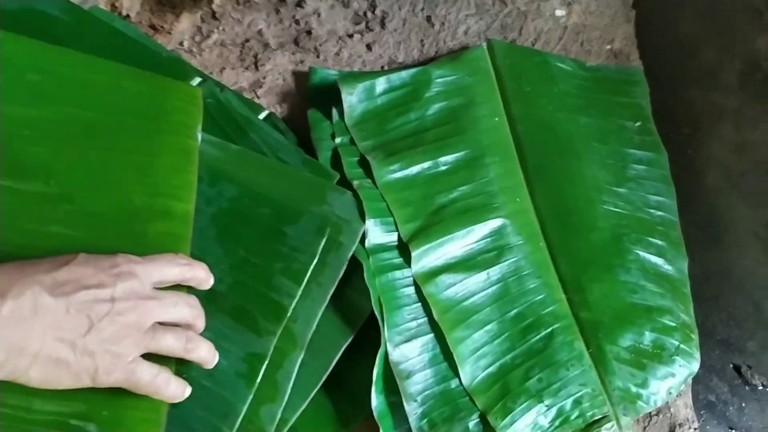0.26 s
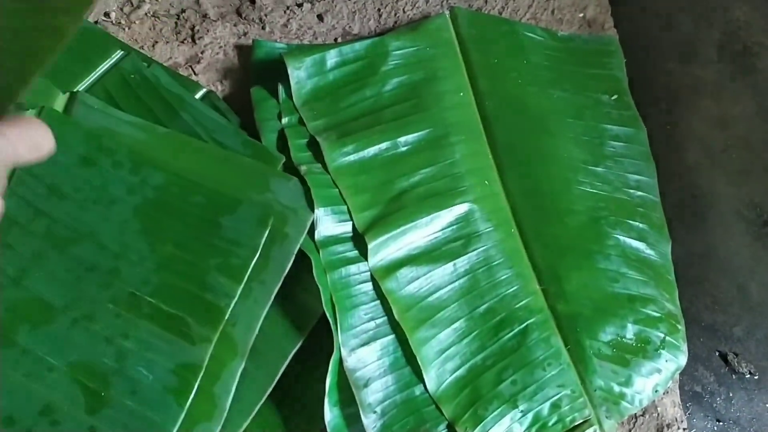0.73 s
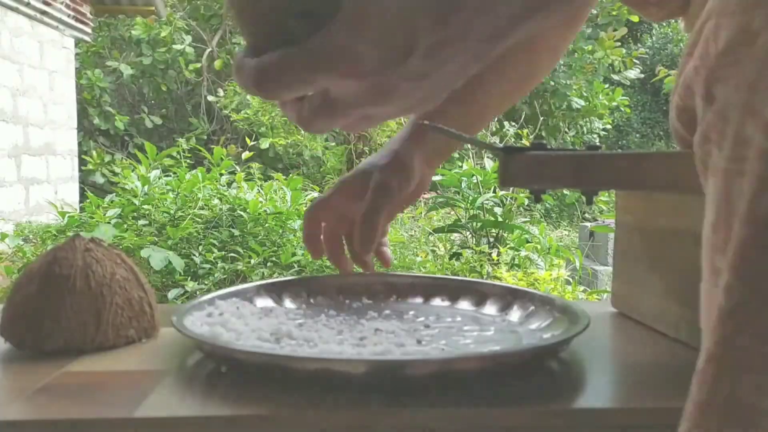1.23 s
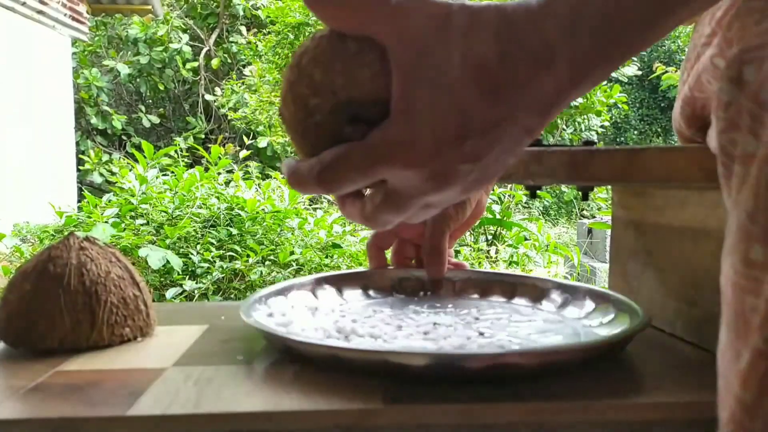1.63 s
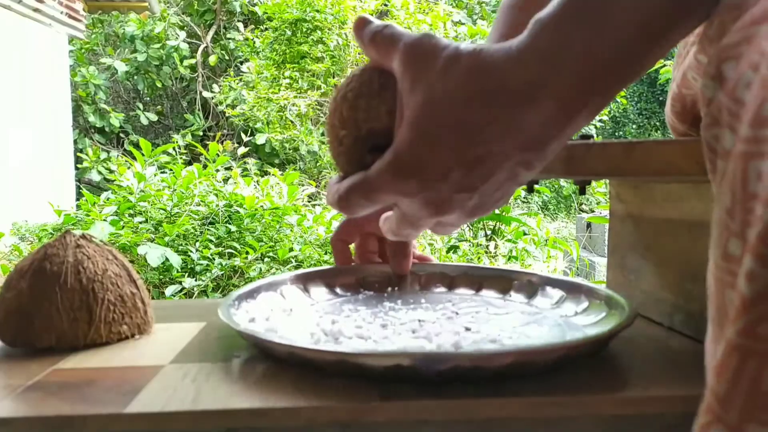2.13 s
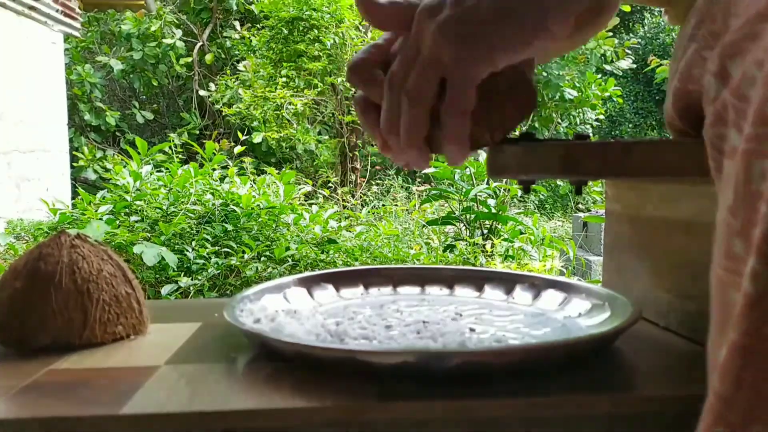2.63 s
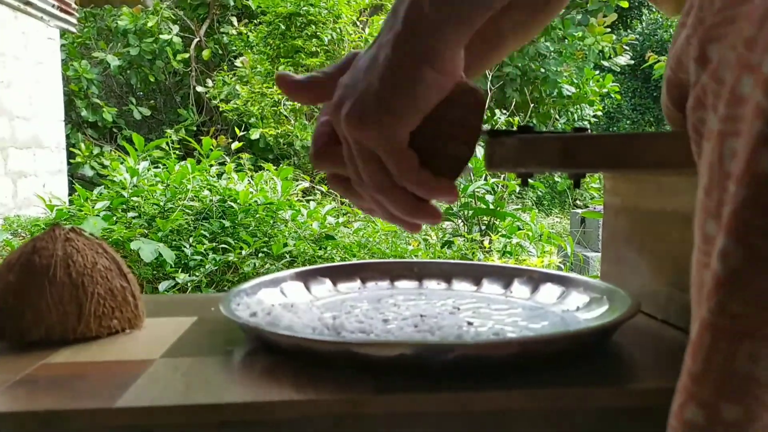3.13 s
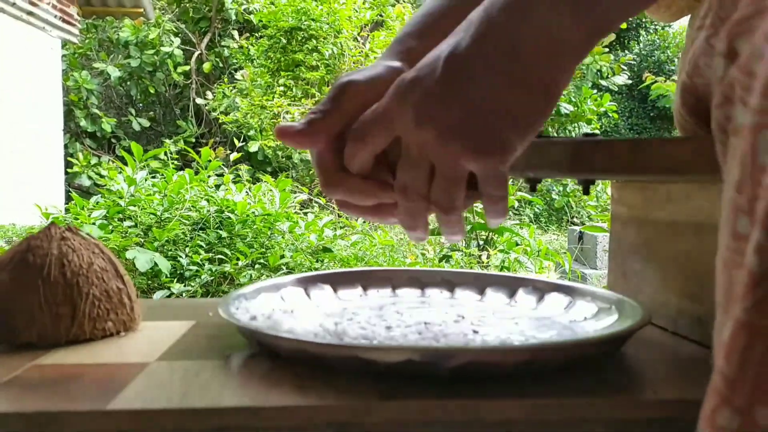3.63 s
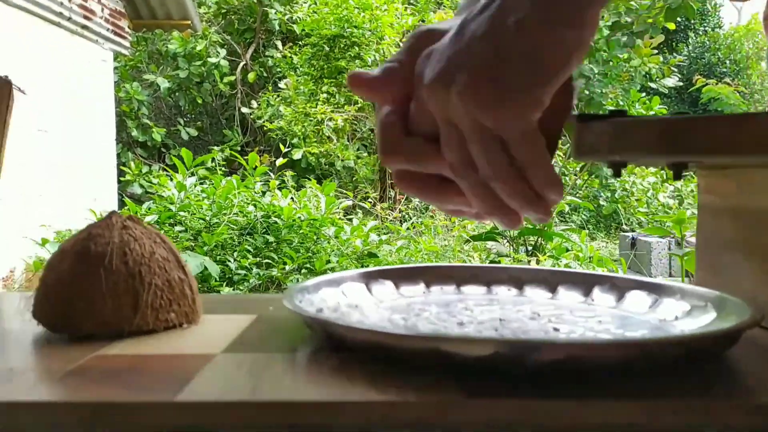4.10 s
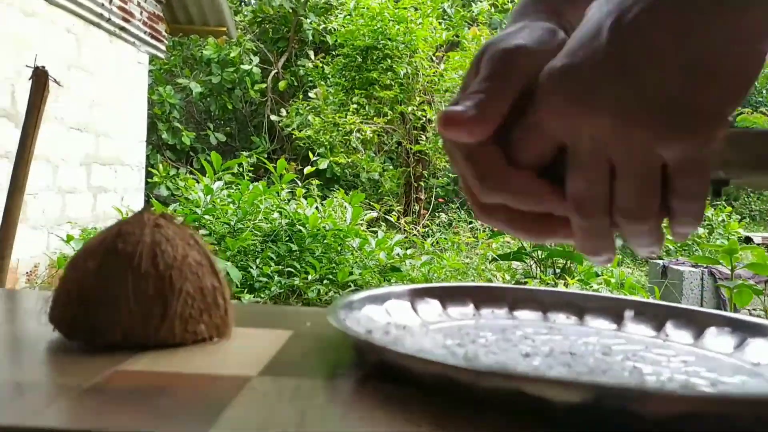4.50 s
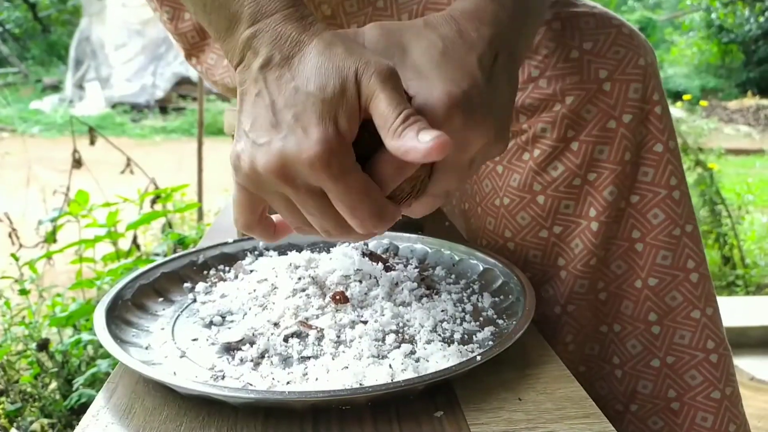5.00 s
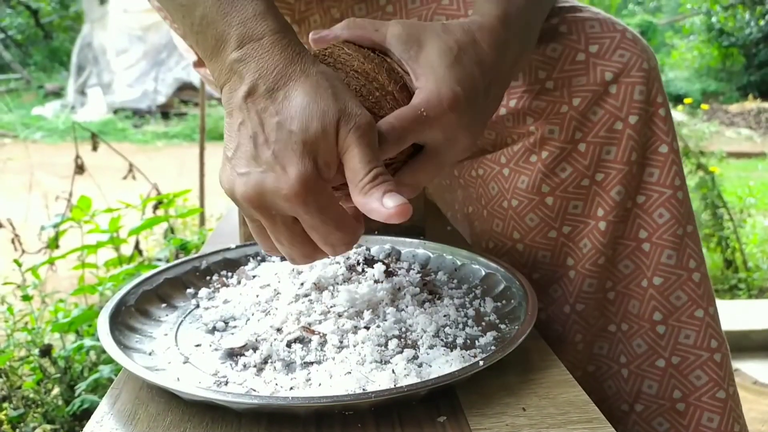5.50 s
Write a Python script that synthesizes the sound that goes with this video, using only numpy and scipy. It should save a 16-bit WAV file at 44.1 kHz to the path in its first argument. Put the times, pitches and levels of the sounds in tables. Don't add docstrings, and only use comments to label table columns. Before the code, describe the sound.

Three joined close takes outdoors under a porch: quiet leaf rustle fading away; fading in, fibrous husk brushing ending in crackle; then coconut shell grated on steel teeth. Each stroke is a burst of fast knocks, hollow and woody, with wet-dry tearing hiss and slight metallic ring. The last strokes, heard from the front, are strongest, with dull bench thuds. Thin insect shimmer and soft rumble continue behind.

```python
import sys
import numpy as np
from scipy import signal
from scipy.fft import rfft, irfft, next_fast_len
from scipy.io import wavfile
from scipy.ndimage import uniform_filter1d, map_coordinates

SR = 44100
rng = np.random.default_rng(int(sys.argv[2]) if len(sys.argv) > 2 else 0)


def wav_record(signal):
    frames = np.transpose(np.atleast_2d(signal))
    bounded = np.clip(frames, -1, 1)
    quanta = np.round(bounded * 32767).astype(np.int16)
    wavfile.write(sys.argv[1], SR, quanta)


def ratio_of_db(decibels):
    return 10 ** (np.asarray(decibels, float) / 20)


N = 253575
FRONT_S = 4.6

# start [t/s], hiss [level/dB], shell [level/dB], tilt [dB/octave], tilt change [per dB of hiss]
STRETCHES = [
    (0, -77, -77.5, 0, -0.25),
    (1.064, -77.5, -81, 1.5, 0.1657),
    (2.5, -69.5, -74.5, -1, -0.0341),
    (4.6, -66.5, -75, 2, -0.156),
]
# [f/Hz], width [f/Hz], [level/dB]
SHELL_MODES = [
    [(281, 68, -2), (408, 104, -2.5), (523, 58, 2.5), (824, 175, -5.5), (1670, 1700, -21)],
    [(240.1, 35, -7), (532, 64, 9), (632, 25, -2), (877, 180, 1), (1090, 280, -3.5), (1640, 360, -6.5)],
]
# [t/s], peak [level/dB]
TAPS = [(2.5758, -48), (2.6891, -29), (2.9761, -47.5), (3.2873, -35), (3.8456, -43), (4.2478, -42.5),
        (4.2829, -36), (4.6587, -34), (4.6778, -48), (5.0494, -33.5), (5.3239, -45), (5.4902, -42),
        (5.5065, -37.5), (5.56, -37)]


def unit(x):
    return x / np.sqrt(np.mean(x ** 2) + 1e-20)


def along(points, hz):
    f, v = np.transpose(points)
    return np.interp(np.log(hz + 1), np.log(f + 1), v)


def wobble(rate_hz):
    knots = rng.standard_normal(int(N * rate_hz / SR) + 4)
    return map_coordinates(knots, [np.arange(N) * rate_hz / SR])


def filtered(x, response):
    m = next_fast_len(N + SR // 2)
    return irfft(rfft(x, m) * response(np.fft.rfftfreq(m, 1 / SR)), m)[..., :N]


def high_pass(f, corner_hz):
    return 1 / (1 + (corner_hz / (f + 1)) ** 4)


def modes(table, f):
    total = 0
    for k, (centre, width, db) in enumerate(table):
        total = total + (-1) ** k * ratio_of_db(db) * 1j * f * width / (centre ** 2 - f ** 2 + 1j * f * width)
    return total


def struck(rows, gain_db):
    x = np.zeros(N)
    x[[round(row[0] * SR) for row in rows]] = [ratio_of_db(row[1] + gain_db) for row in rows]
    return x


def slips(per_s, spread_db):
    when, size, sign = rng.random((3, 2, N))
    heights = ratio_of_db(-spread_db * np.log(size + 0.011)) * np.sign(sign - 0.5)
    return unit((when < per_s / SR) * heights)


def patchy(x, depth_db, tilt_db=0):
    hz, t, z = signal.stft(x, SR, nperseg=256)
    field = uniform_filter1d(rng.standard_normal(z.shape[1:]), size=3, axis=0)
    field = uniform_filter1d(field, size=14, axis=1)
    octaves = np.log2(np.clip(hz, 1000, None) / 4000)[:, None]
    tilt = octaves * np.interp(t * SR, np.arange(N), tilt_db + np.zeros(N))
    return signal.istft(z * ratio_of_db(depth_db * unit(field) + tilt), nperseg=256)[1][:, :N]


def yard():
    # [t/s], [level/dB]
    rumble_level = [(0.0, -76.5), (0.3, -75), (0.8, -72), (1.3, -75), (2.56, -71), (2.88, -68),
                    (3.38, -64.5), (3.7, -70), (4.05, -63), (4.5, -61.5), (4.84, -75), (5.05, -58),
                    (5.48, -75), (5.75, -62.5)]
    # [f/Hz], [dB per Hz]
    rumble_colour = [(12, -41), (20, -8), (27, -9), (59, 3.5), (97, 2), (140, -7.5), (200, -6.5),
                     (290, -6.5), (600, -60)]
    # [f/Hz], [dB per Hz]
    air_colour = [(88, -23), (150, 2), (1670, -7), (4500, -17), (8550, -6.5), (9990, -7), (11400, -17),
                  (15600, -5)]
    # start [t/s], pitch [f/Hz], half width [f/Hz], insects [level/dB], air [level/dB]
    chorus = [
        (0, 9240, 266, -69.5, -66.5),
        (1.064, 10070, 480, -66.5, -71.5),
        (2.68, 10000, 400, -72.5, -70),
        (4.62, 9340, 269.8, -67, -77),
    ]
    t = np.arange(N) / SR
    start, *columns = np.transpose(chorus)
    now = np.searchsorted(start, t, side="right") - 1
    hz, width, insect_db, air_db = np.array(columns)[:, now]

    a, b, c = rng.standard_normal((3, N))
    shared_bass = np.array([a + 0.5 * b, a - 0.5 * b])
    rumble = unit(filtered(shared_bass, lambda f: ratio_of_db(along(rumble_colour, f))))
    wash = filtered(rng.standard_normal((2, N)) + 0.67 * c, lambda f: ratio_of_db(along(air_colour, f)))
    air = unit(patchy(wash, depth_db=4.0))

    def band(half_width):
        return unit(filtered(rng.standard_normal((2, N)), lambda f: 1 / (1 + (f / half_width) ** 3)))

    spread = np.where(width > width.mean(), band(width.max()), band(width.min()))
    insects = spread * np.sqrt(2) * np.sin(2 * np.pi * np.cumsum(hz) / SR)
    rumble_db = np.interp(t, *np.transpose(rumble_level)) + 1.8 * wobble(8)
    return ratio_of_db(rumble_db) * rumble + ratio_of_db(air_db) * air + ratio_of_db(insect_db + 1.7 * wobble(46)) * insects


def effort(part):
    # hardest moment [t/s], rise [t/s], fall [t/s], hiss [level/dB], shell [level/dB]
    leaf = [(.125, 0.24, 0.088, -67.5, -70.5), (.24, 0.046, 0.042, -71.5, -57),
            (.41, 0.55, 0.43, -61.5, -76), (.67, 0.46, 0.54, -61.5, -64.5)]
    husk = [(1.395, 0.097, 0.34, -53.5, -69.5), (1.48, 0.21, .2, -48.5, -76),
            (1.57, 0.19, 0.29, -39.5, -72.5), (1.668, 0.12, .1, -33, -63.5),
            (1.906, 0.028, 0.038, -41.5, -49), (2.018, 0.21, 0.45, -45.5, -69.5),
            (2.224, 0.068, 0.19, -46, -58.5)]
    side_on = [(2.73, 0.092, 0.29, -47, -42), (2.802, 0.14, 0.099, -37.5, -28.5),
               (3.082, 0.064, 0.14, -32, -25), (3.38, 0.081, 0.17, -36.5, -29.5),
               (2.92, 0.3, 0.26, -72.5, -52.5), (3.21, 0.17, 0.14, -64.5, -44.5),
               (3.574, 0.18, 0.18, -59.5, -58), (3.735, .02, .08, -63.5, -68), (3.77, .05, 0.078, -65, -86),
               (3.938, 0.048, 0.12, -47, -37), (3.986, 0.11, 0.16, -38, -30.5),
               (4.103, 0.15, 0.069, -48, -38.5), (4.302, 0.068, 0.083, -47, -39.5),
               (4.339, 0.054, 0.069, -33.5, -24.5), (4.388, 0.19, 0.13, -42, -36.5),
               (4.58, 0.6, 0.18, -59, -54.5)]
    head_on = [(4.69, 0.2, 0.093, -53, -57), (4.78, 0.042, 0.17, -34, -26.5),
               (4.842, 0.1, 0.11, -34.5, -21), (4.915, .12, 0.068, -43.5, -32),
               (5.069, 0.052, 0.11, -36.5, -32.5), (5.138, 0.082, .14, -28.5, -16.5),
               (5.211, 0.25, 0.052, -37, -28.5), (5.29, .1, 0.2, -53.5, -47),
               (5.55, 0.69, 0.9, -60.5, -55.5), (5.679, 0.057, 0.13, -33.5, -21),
               (5.755, 0.093, .1, -34.5, -28)]
    t = np.arange(N) / SR
    _, rest_hiss_db, rest_shell_db, tilt_db, tilt_per_db = STRETCHES[part]
    rubs = [(s, 0.0089, 0.064, db - 22, db - 13.5) for s, db in TAPS]
    power = np.ones(N) * ratio_of_db([[2 * rest_hiss_db], [2 * rest_shell_db]])
    for s, rise, fall, hiss_db, shell_db in [leaf, husk, side_on, head_on][part] + rubs:
        near = slice(max(0, int((s - 2 * rise) * SR)), int((s + 2 * fall) * SR))
        away = np.where(t[near] < s, (s - t[near]) / rise, (t[near] - s) / fall)
        drop_db = 36.5 * np.abs(away) ** 1.452
        power[:, near] += ratio_of_db(2 * (np.array([[hiss_db], [shell_db]]) - drop_db))
    hiss_db, shell_db = 10 * np.log10(power)
    return hiss_db, shell_db, tilt_db + tilt_per_db * (hiss_db - rest_hiss_db)


def rubbing(part, jolts):
    # [f/Hz], [dB per Hz]
    hiss_colour = [
        [(710, -19), (1200, -17), (1670, -15), (3470, -7), (6010, -10.5), (8560, -9.5), (9330, -5), (10200, -7),
         (15600, -19)],
        [(710, -2.5), (1200, -15.5), (1840, -5), (2990, -0.5), (3260, -4.5), (3790, -1), (4590, -3.5),
         (5630, -11), (12700, -21.5), (15600, -29.5)],
        [(710, 6.5), (1200, -4.5), (1370, -7.5), (3190, -3.5), (3870, -1), (4310, 3), (6980, -10),
         (8380, -11.5), (12900, -7), (15600, -19)],
        [(1060, -7.5), (1800, -12), (2780, -16), (3150, -11), (4330, -15), (5140, -12.5), (7440, -17.5),
         (8370, -11), (12700, -20.5), (15600, -21)],
    ]
    # [f/Hz], width [f/Hz], [level/dB]
    blade_modes = [
        [(3390, 110, -3.5), (4040, 89, -26), (8580, 970, 7)],
        [(3180, 88, -5.5), (5060, 360, -13), (8250, 620, -6.5)],
    ]
    loose_db, firm_db = -52, -33
    front = int(part == 3)
    hiss_db, shell_db, tilt_db = effort(part)
    chatter = wobble(60)

    shake = ratio_of_db(2.1 * chatter) * slips(800, spread_db=3)
    pressed = unit(patchy(filtered(shake, lambda f: modes(SHELL_MODES[front], f)), depth_db=0.5))
    loose = unit(filtered(shake, lambda f: modes(SHELL_MODES[0], f)))
    firm = np.clip((shell_db - loose_db) / (firm_db - loose_db), 0, 1)
    shell = firm * pressed + (1 - firm) * loose

    bite = np.clip(uniform_filter1d(np.abs(jolts[0]), size=130) / ratio_of_db(shell_db), 0, 3)
    grain = slips(5000, spread_db=2.0) + 0.9 * rng.standard_normal((2, N))
    fibres = ratio_of_db(1.18 * chatter + 0.56 * wobble(250)) * grain
    torn = patchy((1 + 0.18 * bite) * fibres, depth_db=3.5, tilt_db=tilt_db)

    def colour(f):
        ring = 1 + (part > 1) * np.abs(modes(blade_modes[front], f))
        return ratio_of_db(along(hiss_colour[part], f)) * ring * high_pass(f, 900)

    hiss = unit(filtered(torn, colour) / ratio_of_db(0.057 * tilt_db))
    return ratio_of_db(hiss_db + 3.0) * hiss + ratio_of_db(shell_db - 4.5) * shell / (1 + 0.5 * bite)


def ticks():
    # [t/s], peak [level/dB], thud re peak [level/dB], top end re peak [level/dB]
    dry_ticks = [(0.0174, -83, -7, 5), (0.2338, -68, -1, -14), (0.622, -43, -14, -3),
                 (0.6649, -43.5, -8, -12), (1.5596, -37.5, -40, 12.5), (1.8855, -51, -21, 3),
                 (1.903, -49, -30, -11), (2.026, -30, -32, -17), (2.2047, -27.5, -26, 2),
                 (2.221, -35.5, -16, 4), (2.256, -28, -26, -10)]
    # [t/s], peak [level/dB], top end re peak [level/dB]
    clicks = [(2.5736, -43.5, -3), (2.6878, -56, 15), (2.7954, -30, -23), (2.978, -36.5, -2.5),
              (3.2876, -37, -5), (3.3411, -32, -16), (3.723, -51, 10.5), (3.845, -44, 3.5),
              (3.912, -46.5, 6), (4.21, -51.5, -8), (4.2477, -38, 0.5), (4.654, -37.5, -3),
              (5.0683, -44.5, 21.5), (5.1273, -21, -2), (5.6538, -27, -1.5)]
    crackle = [(2.2665 + k * 0.0238, -35 - k * 3.5, -18, -16) for k in range(6)]
    soft = dry_ticks + crackle
    snaps = [(s, db, top_db) for s, db, _, top_db in soft] + clicks
    t = np.arange(SR // 40) / SR
    decay = ratio_of_db(-60 * t / 0.026) + 0.14 * ratio_of_db(-60 * t / 0.0017)

    def burst(rows):
        return signal.fftconvolve(struck(rows, gain_db=1.5), decay)[:N] * rng.standard_normal((2, N))

    body = filtered(burst(snaps), lambda f: high_pass(f, 1900) / (1 + (f / 6000) ** 4))
    top_rows = [(s, db + top_db) for s, db, top_db in snaps]
    top = filtered(burst(top_rows), lambda f: high_pass(f, 6000) / (1 + (f / 11500) ** 6))
    thud = struck([(s, db + thud_db) for s, db, thud_db, _ in soft], gain_db=36)
    return body + top + filtered(thud, lambda f: modes(SHELL_MODES[0], f))


def bench():
    # [t/s], peak [level/dB]
    bumps = [(2.227, -52.5), (4.335, -37), (4.42, -46.5), (4.849, -45), (5.16, -34), (5.281, -52),
             (5.328, -44.5), (5.561, -53)]
    pitch_hz, swell_s = 220, 0.005
    t = np.arange(SR // 10) / SR
    push = t / swell_s * np.exp(1 - t / swell_s) * np.sin(2 * np.pi * pitch_hz * t)
    return signal.fftconvolve(struck([(s - swell_s, db) for s, db in bumps], gain_db=2.5), push)[:N]


def catches():
    # [t/s], peak [level/dB]
    hardest = [(2.7204, -30.8), (2.7365, -32), (2.7482, -27.1), (2.7905, -24.8), (3.0505, -30.5),
               (3.0723, -21.3), (3.0893, -21.4), (3.1078, -22.1), (3.3641, -25.9), (3.3997, -25.5),
               (3.9348, -31.9), (3.9779, -26.2), (4.1014, -31.6), (4.3339, -15.9), (4.3661, -27.5),
               (4.7785, -26.3), (4.8066, -20.9), (4.818, -14.5), (4.8378, -15.3), (4.8553, -18.1),
               (4.8952, -25), (4.9093, -24.1), (5.0707, -24.1), (5.0927, -21.7), (5.1302, -14.2),
               (5.1596, -11.5), (5.205, -21.9), (5.6551, -27.6), (5.6843, -18.2), (5.7437, -23.6)]
    tooth_s, scatter = 0.0125, 0.3
    bite_db, skim_db_per_db = -34, 0.7
    start, hard = STRETCHES[2][0], TAPS + hardest
    gap, size = rng.standard_normal((int((N / SR - start) / tooth_s), 2)).T
    when = start + np.cumsum(tooth_s * np.exp(scatter * gap))
    clearance = np.abs(when[:, None] - np.transpose(hard)[0]).min(axis=1)
    free = (clearance > tooth_s / 2) & (when < N / SR)
    at = np.minimum(when * SR, N - 1).astype(int)
    shell_db = np.where(when > FRONT_S, effort(3)[1][at], effort(2)[1][at])
    skim_db = skim_db_per_db * np.minimum(shell_db - bite_db, 0)
    tooth_db = shell_db + skim_db - 0.5 + 2.5 * size
    return hard + list(zip(when[free], tooth_db[free]))


def knocks():
    out, t = np.zeros((2, N + SR)), np.arange(SR // 40) / SR
    swell = t / 0.002 * np.exp(1 - t / 0.002)
    envelope = swell + 0.15 * np.exp(-t / 0.007) * (t > 0.002)
    for s, db in catches():
        hz, _, level_db = np.transpose(SHELL_MODES[int(s > FRONT_S)])[..., None]
        strength, drift, phase = rng.standard_normal((3, 2, len(hz), 1))
        tones = np.sin(2 * np.pi * (hz * (1 + 0.055 * drift) * t + phase))
        ring = (ratio_of_db(level_db + 1.8 * strength) * tones).sum(axis=1) * envelope
        ring = ring / np.abs(ring).max(axis=1, keepdims=True)
        out[:, round(s * SR):][:, :len(t)] += ratio_of_db(db + 2.4) * ring
    return out[:, :N]


def porch(x):
    # [f/Hz], t60 [t/s]
    t60 = [(200, 0.049), (1000, 0.24), (8000, 0.029)]
    out, step = np.zeros((2, N + SR)), SR // 5
    for start in range(0, N, step):
        hz, t, z = signal.stft(rng.standard_normal((2, SR // 4)), SR, nperseg=128)
        tail = signal.istft(z * ratio_of_db(-60 * t / along(t60, hz)[:, None]), SR, nperseg=128)[1]
        wet = signal.fftconvolve(x[None, start:start + step], tail / np.linalg.norm(tail[0]), axes=1)
        out[:, start:start + wet.shape[1]] += wet
    return out[:, :N]


def heard(pair, lean):
    # [f/Hz], [0..1]
    likeness = [(100, 1), (260, 0.92), (520, 0.97), (1000, 0.31), (2400, 0.087), (6000, 0.01)]
    # [f/Hz], [0..1]
    late_share = [(300, 0.47), (1200, 1), (2500, 0.47), (9000, 0.23)]

    def turn(hz):
        return np.arccos(np.clip(along(likeness, hz), -1, 1)) / 2

    def difference(hz):
        late = np.clip(along(late_share, hz), 0, 1)
        return np.sin(turn(hz)) * np.array([-1j * np.sqrt(late), np.sqrt(1 - late)])

    def leaning(hz):
        small = (1j * hz / (130 + 1j * hz)) ** 3
        return small * ratio_of_db(along(lean, hz) * np.array([[0.5], [-0.5]]))

    mid = filtered(pair[0], lambda hz: np.cos(turn(hz)))
    side = filtered(pair, difference).sum(axis=0)
    return filtered(np.array([mid + side, mid - side]), leaning)


def scene():
    # [f/Hz], [level/dB]
    leans = [
        [(60, 0), (180, 1), (550, -1), (1650, 5.5), (4970, 3.5), (15000, -4)],
        [(60, -2), (180, -1), (550, -1.5), (1650, 3), (4970, 4.5), (15000, -1)],
        [(60, 7), (180, 1), (550, 3), (1650, -1), (4970, 6.5), (15000, -5.5)],
        [(60, 14), (180, -2.5), (550, 1.5), (1650, -3), (4970, 4.5), (15000, 0.5)],
    ]
    jolts = knocks()
    hits = jolts + ticks() + bench()
    which = np.searchsorted([row[0] for row in STRETCHES], np.arange(N) / SR, side="right") - 1
    near = np.zeros((2, N))
    for part, lean in enumerate(leans):
        near += heard((rubbing(part, jolts) + hits) * (which == part), lean)
    reverb = heard(porch(near.mean(axis=0)), [(60, 0.0049), (15000, 0.024)])
    return near + ratio_of_db(-13.5) * reverb + yard()


def roll_off(x):
    return signal.sosfilt(signal.butter(12, 15770, fs=SR, output="sos"), x)


def record(dry):
    join_s, fade_out_s, fade_in_s, top_hz = 1.064, 0.5, 0.56, 15780
    t = np.arange(N) / SR - join_s
    fade = np.clip(np.where(t < 0, -t / fade_out_s, t / fade_in_s), 0, 1) ** 0.98
    mix = filtered(dry * fade, lambda hz: hz < top_hz)
    return roll_off(mix)


dry = scene()
out = record(dry)
wav_record(out)
```